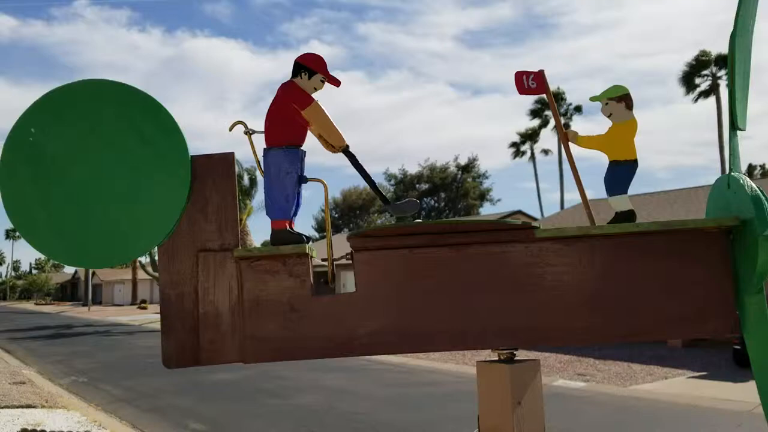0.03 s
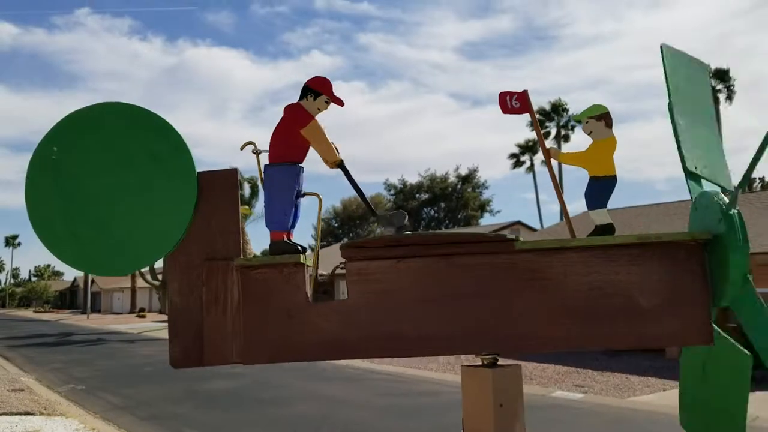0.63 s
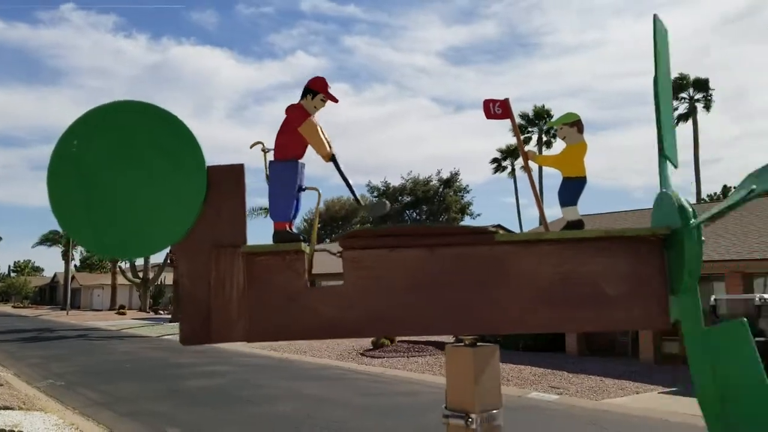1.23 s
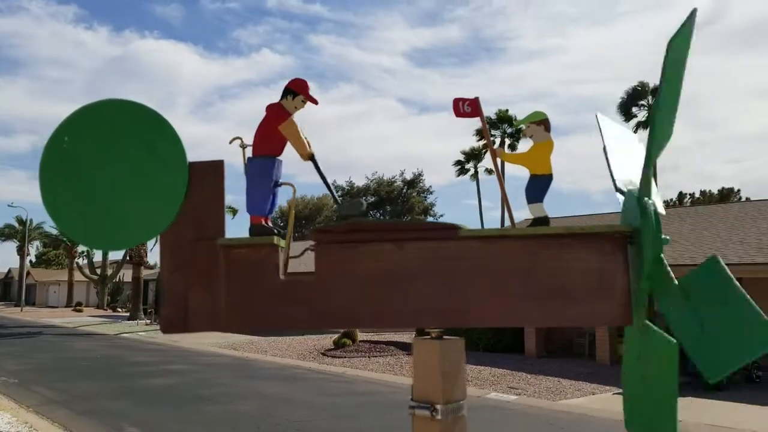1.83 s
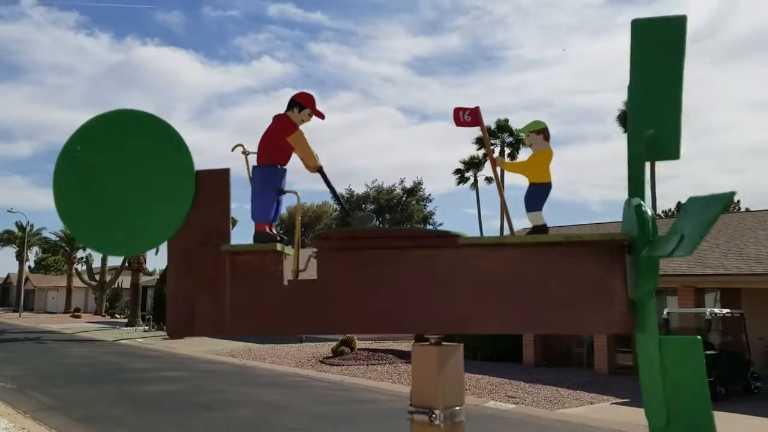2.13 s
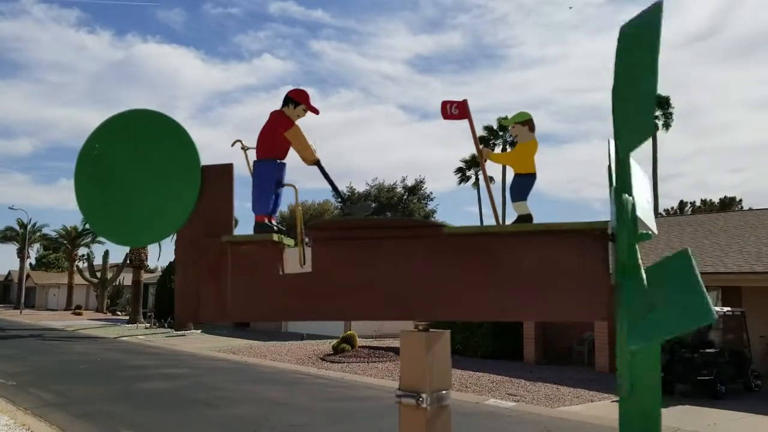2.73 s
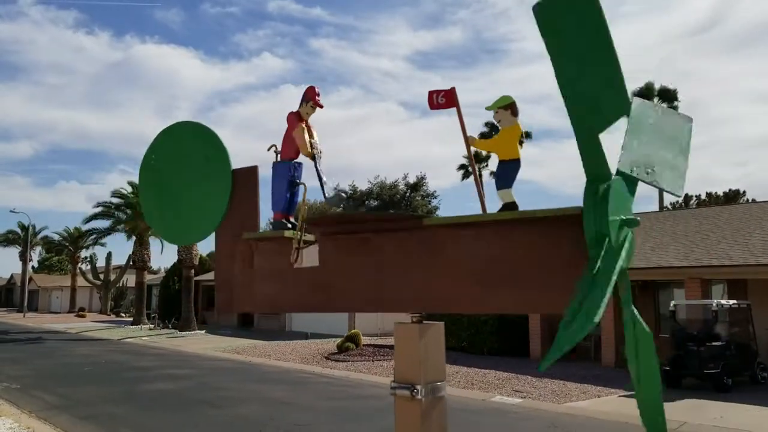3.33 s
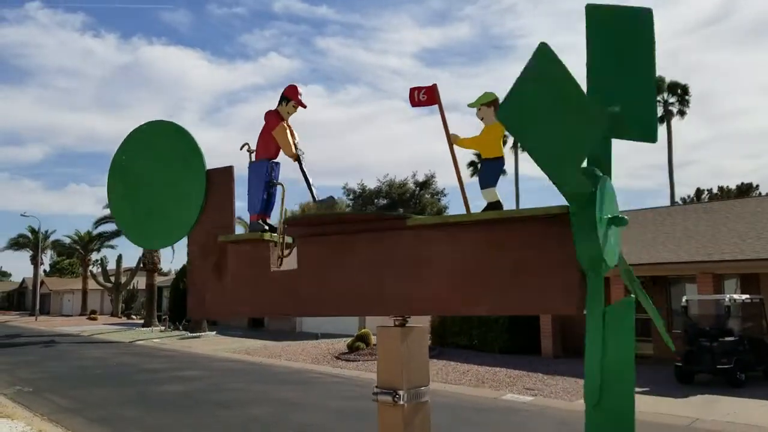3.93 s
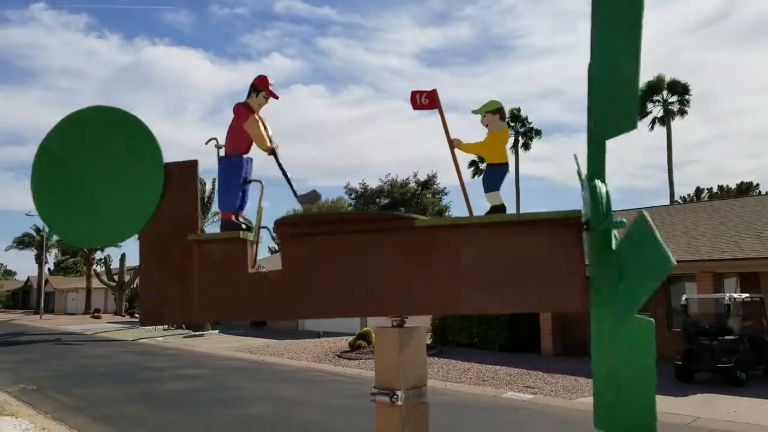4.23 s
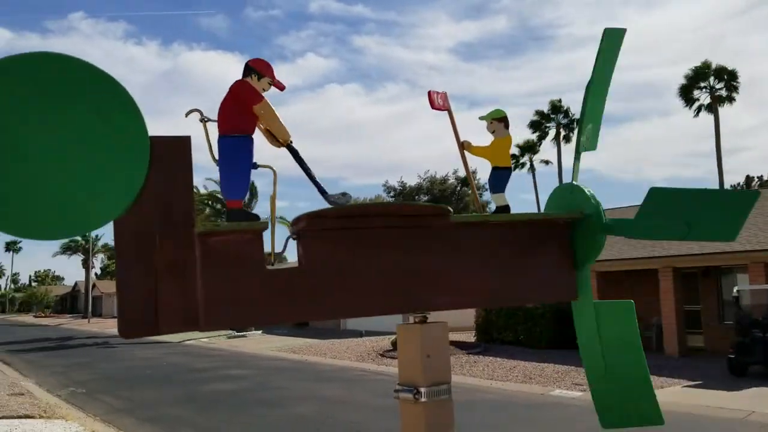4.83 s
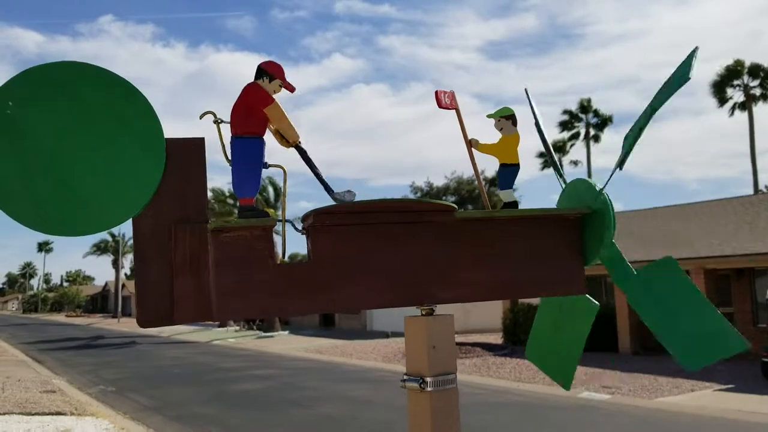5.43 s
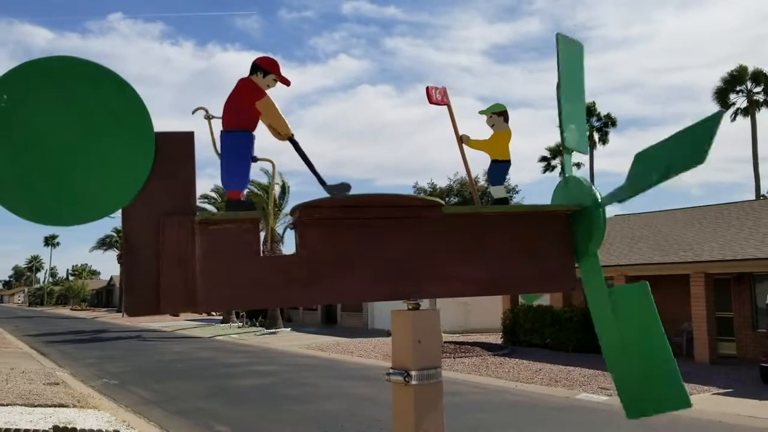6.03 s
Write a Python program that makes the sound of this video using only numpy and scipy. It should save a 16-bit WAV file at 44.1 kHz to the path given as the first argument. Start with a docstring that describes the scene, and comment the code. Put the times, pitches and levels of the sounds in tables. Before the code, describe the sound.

A wooden whirligig spins close to the microphone on a quiet street. Its loose wire linkage clicks rapidly and unevenly, mixed with wooden knocks, while gusts rumble and pop on the left. The crank soon adds short, high squeaks and scrapes, and the wind spreads to both sides. The clatter thins out past the middle, then returns with a few dull bumps. Faint bird chirps, rustling leaves and distant traffic lie behind.

```python
"""A wooden whirligig in a quiet street, close to a hand-held camera with two microphone ports.
At first, gusts buffet and click in the left port while the wire linkage chatters in its loose holes and
the carved figure knocks on the frame. From about 1.3 s the dry crank squeaks as well as scrapes, and
the wind spreads to both ports. Midway a small bird chirps far off; after 5 s the frame bumps its post.
Leaves rustle and distant roads rumble throughout."""
import sys
import numpy as np
from scipy import signal
from scipy.fft import rfft, irfft
from scipy.io import wavfile
from scipy.ndimage import uniform_filter1d

SR = 44100
rng = np.random.default_rng(int(sys.argv[2]) if len(sys.argv) > 2 else 0)


def master(y):
    """Save y as 16-bit WAV."""
    cut = np.clip(np.atleast_2d(y).T, -1, 1)
    pcm = np.round(cut * 32767)  # scale
    wavfile.write(sys.argv[1], SR, pcm.astype(np.int16))


N = 268128
T = np.arange(N) / SR

# clear hits of the wire linkage: (time [s], level [dB], brightness [dB], bounce decay [s])
WIRE_HITS = [(0.1059, -28.5, 3, 0.0092), (.196, -35, -12, 0.0051), (0.205, -27, -11, 0.0099),
             (.221, -35, -5, 0.004), (.251, -42, 6, 0.0036), (0.292, -30, -10, 0.002),
             (0.2949, -23, -9, 0.0025), (.302, -24, -26, 0.0036), (.308, -30, -27, 0.0036),
             (0.3255, -17.5, 6, 0.0052), (0.33, -20.5, -1, 0.0033), (.340, -38, 0, .003),
             (0.353, -27, -6, 0.011), (0.365, -24, -8, 0.0041), (0.377, -45, -10, .004),
             (0.415, -30, -7, 0.0086), (0.462, -26.5, -8, 0.003), (.474, -23.5, -6, 0.0063),
             (.487, -27.5, 2, 0.0039), (.504, -36, 8, 0.0027), (.523, -37, 11, 0.002),
             (0.5435, -19.5, -3, 0.002), (.551, -21, -1, 0.0035), (.5555, -31, -12, .002),
             (0.571, -21, -3, 0.007), (.583, -32, -2, .002), (0.5883, -25, -2, 0.003),
             (0.6153, -25.5, -3, 0.012), (0.628, -25, 1, .006), (0.642, -32, -6, .003),
             (.656, -38, -12, .003), (0.685, -36, -3, 0.0061), (0.6984, -22.5, 3, 0.0086),
             (0.71, -25, -9, 0.005), (0.724, -23.5, -9, 0.0045), (.743, -27.5, 4, .003),
             (.759, -28.5, 3, 0.0037), (.78, -37, 12, .003), (0.801, -28, -23, 0.0058),
             (0.811, -21.5, -23, 0.0041), (0.835, -22.5, 2, 0.01), (0.844, -20, -4, 0.0048),
             (.867, -30, -7, 0.0046), (0.88, -30, -4, .005), (0.893, -32, 4, .003), (.909, -37, 5, .004),
             (0.935, -37, 7, .004), (.98, -27.5, -8, 0.0067), (.994, -30.5, -6, 0.018),
             (1.036, -36, -1, .003), (1.075, -26, -4, 0.0023), (1.085, -29, -12, 0.0068),
             (1.105, -29, 0, 0.0056), (1.12, -29.5, 2, .004), (1.135, -31, -3, 0.0059),
             (1.173, -36, -4, 0.007), (1.196, -31.5, -3, 0.0046), (1.2494, -30, -13, 0.0042),
             (1.281, -30, -11, 0.0068), (1.362, -27, -6, 0.0064), (1.376, -40, -11, .003),
             (1.395, -29.5, -6, 0.0072), (1.409, -30, 1, 0.0033), (1.445, -35, -2, .003),
             (1.467, -33, 11, 0.0048), (1.548, -40, -5, 0.0034), (1.566, -31.5, -14, 0.0026),
             (1.593, -22.5, -11, 0.0054), (1.6824, -25, -10, 0.011), (1.696, -33, 6, 0.031),
             (1.783, -33, 5, 0.0043), (1.899, -39, -17, .004), (1.953, -29.5, 0, 0.011),
             (2.0343, -25, -10.5, 0.015), (2.059, -32, 8, 0.0076), (2.095, -36, 2, .003),
             (2.251, -33.5, -9, 0.0037), (2.298, -33.5, -1, 0.0082), (2.323, -32, 11, 0.0072),
             (2.386, -25.5, -4, 0.0096), (2.452, -31, -3, .003), (2.501, -27.5, 3, 0.01),
             (2.608, -35, -10, 0.0044), (2.681, -33.5, 2, 0.017), (2.7372, -27.5, -5, 0.004),
             (2.747, -27.5, -11, 0.01), (2.757, -34, 4, .004), (2.8375, -32.5, 4, 0.011),
             (2.849, -32, -4, .003), (2.964, -39, 0, .008), (2.98, -29.5, -1, 0.012),
             (3.024, -28, -6, 0.0084), (3.043, -34, 4, .004), (3.0684, -36, 7, .004),
             (3.122, -26, -7, 0.0082), (3.15, -25, 17, 0.0035), (3.1844, -38, 3, .009),
             (3.259, -37, -7, .004), (3.2928, -29, 2.5, 0.005), (3.482, -34.5, -5, 0.024),
             (4.232, -35, -7, 0.012), (4.381, -29.5, -43, 0.014), (4.533, -31.5, -7, 0.0076),
             (4.634, -33, -17, .003), (4.6665, -29.5, -11, 0.011), (4.741, -23.5, -3, 0.0074),
             (4.7577, -23, -21, 0.0079), (4.83, -22.5, -2.5, 0.018), (4.924, -31.5, -9, 0.018),
             (4.962, -29.5, -5, 0.0046), (5.001, -25, -7, 0.012), (5.048, -36, -14, 0.0043),
             (5.0828, -28.5, -17, 0.0083), (5.0963, -23.5, -12, 0.0028), (5.12, -25.5, 3, 0.0098),
             (5.1706, -31.5, -6, 0.0081), (5.1947, -30.5, -5, 0.0054), (5.379, -26, -7, 0.005),
             (5.4528, -29, -17, 0.0025), (5.4632, -21.5, -9, 0.0096), (5.498, -21.5, 1, 0.005),
             (5.51, -30, 0, .004), (5.5573, -33, -18, 0.0046), (5.567, -31, -13, .003),
             (5.6115, -28.5, -4, 0.016), (5.713, -28, -53, 0.0045), (5.774, -29, -2, 0.0073),
             (5.8564, -22, -20, 0.0071), (5.8848, -28.5, 1, 0.0065), (5.984, -31.5, -9, 0.026)]
# crack of a wire hit: (frequency [Hz], level [dB])
WIRE_SPECTRUM = [(300, -15), (1200, 1), (2400, 0.5), (3100, -3), (3900, 5.5), (5400, 1.5), (6900, 1.5),
                 (8500, -7.5), (9700, -4.5), (11400, 4.5), (14000, -1), (16000, -1)]
# modes of the linkage and its fittings: (frequency [Hz], level [dB], t60 before damping [s])
WIRE_MODES = [(2600, -3, 0.17), (3930, 6.5, 0.045), (4540, 6, 0.037), (4430, 6.5, 0.15), (4720, 5.5, 0.012),
              (5380, 3, 0.0097), (5530, 8.5, 0.054), (6230, 14, 0.074), (6710, 12.5, 0.041),
              (6900, 7, .0074), (10470, 9.5, 0.078), (11380, -3, 0.036), (12800, -2, .04), (12860, -5, .04),
              (13760, 8, 0.039)]
# the figure knocks on the frame: (time [s], level [dB])
FIGURE_KNOCKS = [(0.3245, -28.5), (0.5754, -28.5), (0.837, -25), (0.8482, -32), (.98, -46), (1.024, -36.5),
                 (1.1514, -32.5), (1.25, -40.5), (1.305, -40), (1.398, -34.5), (1.408, -35), (1.437, -38.5),
                 (1.6736, -38.5), (1.966, -37), (2.081, -37), (2.389, -37), (2.432, -32), (2.4607, -33),
                 (2.7776, -24.5), (3, -38.5), (3.0333, -31), (3.054, -36), (3.132, -33), (3.151, -21.5),
                 (4.3935, -37), (4.43, -38), (5.02, -36), (5.086, -41), (5.121, -34.5), (5.389, -35.5),
                 (5.467, -42), (5.4975, -29.5), (5.51, -38), (5.545, -47)]
# modes of the wooden frame: (frequency [Hz], level [dB], t60 [s])
FRAME_MODES = [(570, 1, .04), (1058, 1, 0.066), (1290, 6, 0.071), (1386, 9, 0.037), (1640, -16, 0.011),
               (1770, 11, 0.026), (1905, 12.5, 0.026), (1977, 2, 0.059), (2450, -6.5, 0.078),
               (2650, -2, 0.066)]
# crack of wood on wood: (frequency [Hz], level [dB])
CRACK_SPECTRUM = [(200, -59), (800, -20), (1300, 2.5), (1950, 9.5), (2350, -3.5), (2650, -8), (3100, -14.5),
                  (3900, -3.5), (6000, -12.5), (16000, -12)]
# squeaks of the dry crank: (start [s], length [s], pitch [Hz], level [dB], octave [dB],
# pitch jitter [share], place of the crest [0-1], pitch bend [share], rasp [dB])
CRANK_SQUEAKS = [(1.257, 0.073, 5320, -30, -14.5, .001, 0.43, 0.009, -23),
                 (1.266, .06, 5590, -50, -25, 0.0045, .45, -0.0082, -22),
                 (1.434, 0.15, 2010, -58.5, -32, 0.0044, 0.3, 0.0031, -31),
                 (1.524, 0.047, 3870, -53.5, -28, 0.02, 0.5, -.04, -13),
                 (2.098, 0.089, 5290, -33.5, 0, .001, 0.85, 0.022, -17.5),
                 (2.127, 0.047, 4230, -43.5, -37, .004, 0.46, 0.0059, -16),
                 (3.013, 0.04, 4220, -48, -30, .003, 0.2, -0.02, -21),
                 (3.092, 0.097, 5650, -41.5, -15, 0.0066, 0.55, 0.0069, -6.5),
                 (3.153, 0.055, 5820, -35, -21, 0.014, 0.6, 0.013, -22),
                 (3.177, 0.037, 5480, -37, -15, 0.017, 0.37, -0.041, -9),
                 (3.832, 0.067, 4210, -45, -26, .003, 0.37, -0.013, -21),
                 (3.865, 0.048, 5510, -43, -12, .012, 0.5, 0.04, -19),
                 (3.93, 0.073, 5284, -33.5, -10, 0.0066, 0.42, 0.0088, -22.5),
                 (4.211, 0.32, 1587, -54, -30, .005, 0.2, -0.0029, -27),
                 (4.717, 0.051, 4180, -40.5, -30, 0.0086, 0.53, 0.018, -27),
                 (4.735, 0.12, 5331, -30.5, -3.5, 0.0012, 0.6, .001, -22),
                 (4.748, .045, 11500, -31, -40, .009, 0.7, .055, -23),
                 (5.727, 0.034, 4170, -48.5, -30, .002, .45, -0.012, -24),
                 (5.791, 0.12, 5380, -55.5, -21, .006, 0.44, 0, 0)]
# friction noise under a squeak: (frequency [Hz], level [dB])
RASP_SPECTRUM = [(1500, 2), (3000, -14), (4200, 1), (6800, -6), (8500, -12), (11000, -5.5), (13000, -7),
                 (16000, -8)]
# the shaft rubs on the wood: (start [s], length [s], level [dB], share of creak [0-1])
SHAFT_RUBS = [(0.631, 0.046, -46, 0.6), (3.2, .26, -60.5, .05), (1.42, 0.34, -76, 0),
              (1.657, 0.13, -52.5, 0.04), (2.42, 0.067, -59, 0.06), (4.639, 0.087, -41.5, 0.87),
              (4.762, 0.12, -54, 0.1), (5.071, 0.057, -50, 0), (5.203, 0.18, -50, 0.05),
              (5.432, 0.12, -53, 0.06)]
# noise of a rub: (frequency [Hz], level [dB])
RUB_SPECTRUM = [(500, -18), (1400, 11), (2100, -2), (3000, -2), (4100, 7), (6500, -1.5), (8300, -11),
                (12000, -15), (16000, -26)]
# resonances of the creaking shaft: (frequency [Hz], width [Hz], level [dB])
CREAK_PEAKS = [(2090, 110, -1.5), (2580, 200, -9.5), (3100, 150, -4.5), (3550, 180, -2.5), (5570, 170, -14)]
# the frame bumps its post: (time [s], level [dB])
POST_BUMPS = [(5.026, -28), (5.122, -34), (5.4991, -21.5), (5.513, -34)]
# low modes of the post: (frequency [Hz], level [dB], t60 [s])
POST_MODES = [(144, 3, 0.044), (240, -3.5, 0.052), (327, -2.5, 0.044), (560, -5, .05)]
# gusts and lulls at the microphone: (time [s], rumble [dB], flutter [dB])
GUSTS = [(.11, -35, -43.5), (.3, -25, -28), (.45, -22, -37), (.58, -28.5, -25.5), (.635, -32.5, -54),
         (.78, -23.5, -38), (.84, -34, -59), (.95, -34.5, -67), (1.04, -28.5, -37), (1.12, -39.5, -53),
         (1.18, -33.5, -35.5), (1.25, -42, -52), (1.33, -46.5, -45), (1.55, -50, -47), (1.97, -40.5, -48.5),
         (2.05, -43, -44), (2.11, -37, -34), (2.23, -35.5, -39.5), (2.33, -34, -23), (2.49, -45, -35),
         (2.56, -39.5, -48), (2.65, -44.5, -44.5), (2.73, -35, -32.5), (2.82, -42, -48),
         (2.92, -37.5, -29.5), (3.12, -33.5, -36.5), (3.33, -50.5, -50.5), (3.43, -46.5, -46.5),
         (3.5, -34.5, -37.5), (3.66, -32.5, -27), (3.74, -34.5, -43), (3.92, -35, -27.5),
         (4.2, -31.5, -43.5), (4.28, -35.5, -40), (4.55, -41.5, -43), (4.79, -41, -47.5), (5.0, -44, -47.5),
         (5.27, -41.5, -47), (5.35, -49, -52), (5.47, -42, -45), (5.6, -50, -52), (5.78, -55, -57),
         (5.95, -42.5, -45), (6.08, -49.5, -48)]
# the first gust falls on the left port, later ones on both: (time [s], left over right [dB])
WIND_PAN = [(.11, 37), (.43, 14), (.58, 26), (.87, 3), (1.05, 15), (1.3, 9.5), (1.95, 3), (2.2, -2),
            (3.4, 0), (4.4, -4), (4.9, 2.5), (6.08, 2)]
# deep rumble of the wind: (frequency [Hz], level [dB])
RUMBLE_SPECTRUM = [(15, -29), (35, -8.5), (80, 0), (140, -1), (220, -5), (400, -13), (1000, -39),
                   (3000, -87)]
# flutter above the rumble: (frequency [Hz], level [dB])
FLUTTER_SPECTRUM = [(40, -38), (150, -38), (280, -1), (450, -3), (620, -15), (850, -20.5), (1300, -40),
                    (2200, -58), (5000, -61), (16000, -78)]
# the strongest eddies that hit the ports: (time [s], level [dB], pitch [Hz], length [s])
PORT_EDDIES = [(0.107, -9.5, 433, 0.011), (0.164, -18, 333, 0.0069), (0.171, -10.5, 483, 0.0043),
               (0.257, -8.5, 440, 0.017), (.281, -5.5, 447, 0.012), (0.363, -16.5, 327, 0.0094),
               (0.379, -18.5, 326, 0.012), (0.421, -8.5, 318, 0.0087), (.445, -11, 365, 0.012),
               (0.462, -12.5, 340, 0.0088), (0.49, -20.5, 290, 0.017), (0.554, -11.5, 370, 0.01),
               (0.567, -8.5, 326, 0.016), (0.587, -11, 320, 0.021), (0.66, -15, 283, 0.013),
               (0.733, -9, 272, 0.01), (0.785, -16.5, 300, 0.021), (0.861, -13, 255, 0.007),
               (0.893, -20, 300, 0.015), (0.981, -19.5, 300, 0.012), (1.013, -15.5, 330, 0.0037),
               (1.039, -19, 352, 0.0098), (1.064, -17, 334, 0.006), (1.179, -21, 397, 0.0075),
               (1.198, -26, 344, 0.017), (1.663, -19.5, 312, 0.01), (1.825, -29, 365, 0.0089),
               (1.965, -24, 375, 0.01), (1.992, -16, 385, 0.018), (2.095, -21, 318, 0.013),
               (2.185, -16.5, 420, 0.016), (2.266, -30, 415, 0.0088), (2.303, -18.5, 392, 0.02),
               (2.336, -16.5, 403, 0.0091), (2.371, -17.5, 380, 0.013), (2.389, -25, 427, 0.012),
               (2.452, -20.5, 407, 0.014), (2.475, -16, 413, 0.015), (2.507, -25, 400, 0.0065),
               (2.677, -27, 363, 0.017), (2.73, -23, 412, 0.022), (2.869, -22, 376, 0.006),
               (2.894, -20.5, 364, 0.024), (2.954, -20, 350, 0.016), (3.072, -20.5, 374, 0.017),
               (3.092, -21, 380, 0.015), (3.373, -29, 260, 0.007), (3.47, -18.5, 318, 0.013),
               (3.525, -27, 350, .009), (3.549, -27, 353, 0.01), (3.634, -16, 440, 0.0076),
               (3.657, -16, 332, 0.018), (3.688, -17.5, 360, 0.016), (3.769, -31, 352, 0.015),
               (3.807, -42, 358, 0.016), (3.889, -16, 398, 0.02), (4.045, -18, 424, 0.039),
               (4.121, -14, 322, 0.007), (4.152, -20, 290, 0.012), (4.184, -17, 368, 0.02),
               (4.216, -15.5, 304, 0.0088), (4.36, -25.5, 316, 0.011), (4.412, -17.5, 343, 0.012),
               (4.519, -25.5, 320, 0.016), (4.641, -24.5, 240, 0.0089), (4.675, -27, 240, 0.0078),
               (4.767, -26, 240, 0.0059), (5.652, -38, 240, 0.016), (5.98, -29.5, 224, 0.0058)]
# dry clicks of wind, mostly in one port: (time [s], level [dB], pitch [Hz], left over right [dB])
PORT_CLICKS = [(0.1764, -6.5, 280, 30), (0.2627, -11, 270, 29), (0.2683, -7, 240, 29),
               (0.2951, -4, 210, 28), (0.3232, -12, 300, 27), (0.4201, -14, 209, 17), (0.452, -5, 210, 27),
               (0.5278, -24, 270, 22), (0.5583, -11.5, 240, 27), (0.5687, -11, 210, 28),
               (0.633, -11.5, 1170, 24), (0.6561, -16.5, 386, 25), (0.7362, -17, 240, 23),
               (0.7595, -20, 380, 10), (1.0405, -29, 300, 21), (1.0595, -6.5, 268, 30),
               (1.1933, -16.5, 270, 25), (1.3899, -23.5, 340, 21), (2.2127, -23, 270, -15),
               (2.3078, -18, 210, -1), (2.376, -27, 240, 6), (2.4818, -17.5, 266, 17),
               (2.8993, -15.5, 206, 5), (2.9126, -17, 208, -3), (3.2363, -19.5, 340, 28),
               (3.4553, -22, 300, 25), (3.5433, -20.5, 270, 22), (3.558, -21, 480, 13),
               (3.6383, -14.5, 271, -4), (3.6537, -16.5, 240, -15), (3.6646, -18, 270, -11),
               (3.7035, -23, 270, -12), (3.7121, -20, 240, 15), (3.8514, -20.0, 420, -23),
               (3.8669, -19, 380, -24), (3.9501, -18.5, 540, -22), (3.9667, -28, 240, -14),
               (3.9969, -20, 430, -27), (4.0128, -22.5, 380, -16), (4.0357, -23, 270, 16),
               (4.0506, -14.5, 300, -21), (4.0645, -17, 382, -24), (4.1002, -21, 240, 20),
               (4.1246, -19, 240, 14), (4.2068, -20, 270, 11), (4.2329, -19.0, 430, -17),
               (4.2451, -23, 483, -19), (4.3218, -18, 380, -21), (4.419, -23, 480, -25),
               (4.4317, -20, 480, -24), (4.4449, -23.5, 340, -26), (5.0215, -22, 1200, 3)]
# a far bird: (start [s], length [s], first pitch [Hz], last pitch [Hz], level [dB])
BIRD_CHIRPS = [(2.804, 0.022, 4530, 4150, -48), (2.827, 0.022, 4600, 4200, -47),
               (2.856, 0.014, 3100, 3550, -47), (2.868, 0.032, 4000, 4240, -45.5),
               (3.735, 0.078, 5130, 4800, -53.5), (4.477, 0.06, 4830, 5440, -49),
               (4.514, 0.031, 4900, 4300, -54), (4.583, 0.041, 3900, 4470, -49.5)]
# the breeze in the leaves: (time [s], level [dB])
RUSTLE_LEVELS = [(.11, -59), (.7, -51), (1.2, -57), (1.9, -56.5), (2.5, -54), (3.35, -58), (3.7, -56),
                 (4.35, -54), (4.9, -56), (5.3, -54.5), (5.65, -54), (6.08, -56.5)]
# rustle of the leaves: (frequency [Hz], level [dB])
LEAF_SPECTRUM = [(350, -30), (600, 14.5), (801, 9.5), (869, 7), (931, 6), (1430, 4), (1660, 2.5),
                 (1830, 7.5), (2340, -2), (3990, -2.5), (6830, -10), (8620, -19), (11700, -77),
                 (16000, -47)]
# distant roads: (frequency [Hz], level [dB])
TRAFFIC_SPECTRUM = [(30, 6.5), (130, 8.5), (300, -9), (600, -36), (1000, -17), (2000, -33), (5000, -29)]
# how the ports hear the whirligig and bird: (frequency [Hz], left lead [rad], left over right [dB])
PORT_RESPONSE = [(250, 0, -1), (576, -2.5, 5), (1760, 1.18, 0.5), (3470, -3.5, 4), (3680, 0, 2),
                 (4600, -1, -1), (5500, -1.62, 6.5), (6870, -2, -0.5), (8400, 1.5, 2), (10100, 1.86, -4),
                 (11100, 1.5, 2), (13000, 2, -8.5), (16000, 2, 7)]


def wire_contact(length, bright_db, ring_db=-4, spot_db=9.5, bounce_db=6, damping=1.8, shift=.068):
    """A sharp touch and its tiny bounces crack and ring the wire's modes; pressure shifts and damps them."""
    t = np.arange(5000) / SR
    hz, mode_db, t60 = np.transpose(WIRE_MODES)[:, :, None]
    spot, detune, port = rng.standard_normal((3, len(WIRE_MODES), 1))
    touch = 1.1 * np.exp(-t / .0005)
    bounces = np.exp(-t / max(length, .001)) * unit(amp(bounce_db * np.clip(wander(len(t), hz=533), -2, 2)))
    settling = amp(-28) * np.exp(-t / .025)
    force = noise_pair(len(t), shared=.29) * (touch + bounces + settling)
    weight_db = mode_db + spot_db * spot + bright_db * (hz > 9000)  # each spot favours other modes
    decay = amp(weight_db - 60 * damping * t / t60)
    modes = decay * np.exp(2j * np.pi * hz * (1 + shift * detune) * t) * np.sign(detune)
    ring = ring_modes(force[0], modes, right_phase=.8 * port)
    crack = causal_colour(force, WIRE_SPECTRUM, treble_db=bright_db)
    return unit_burst(unit(crack) + amp(ring_db) * unit(ring))


def linkage(level_db=-11.5):
    """Close up, the loose wire hits the edges of its holes as the crank goes round."""
    out = np.zeros((2, N))
    for at, db, bright_db, length in WIRE_HITS:
        add(out, at, amp(db + level_db) * wire_contact(length, bright_db))
    return out


def chatter(level_db=-55, per_s=45, spread_db=4, slack_s=.04, variants=24):
    """Between the clear hits the slack parts go on ticking lightly, loudest where the hits crowd."""
    at, db = np.transpose(WIRE_HITS)[:2]
    nearby_hits = (amp(db)[:, None] * np.exp(-abs(T[::256] - at[:, None]) / slack_s)).sum(0)
    slack = np.interp(T, T[::256], unit(nearby_hits) ** .55)
    out = np.zeros((2, N))
    for _ in range(variants):
        onsets = rng.random(N) < per_s / variants / SR
        hits = onsets * amp(spread_db * np.minimum(rng.exponential(1, N), 2)) * slack
        out += signal.oaconvolve(hits[None], wire_contact(length=.0056, bright_db=-4), axes=1)[:, :N]
    return amp(level_db) * out


def figure(level_db=-4, crack_t60=.11, shift=.0067, spot_db=.5, bounce_s=.0037):
    """Wood on wood: a blow and its tiny bounces ring the frame's crowded modes, under a rough crack."""
    out, t = np.zeros((2, N)), np.arange(6000) / SR
    hz, mode_db, t60 = np.transpose(FRAME_MODES)[:, :, None]
    for at, db in FIGURE_KNOCKS:
        spot, detune, port = rng.standard_normal((3, len(FRAME_MODES), 1))
        decay = amp(mode_db + spot_db * spot - 60 * t / t60)
        modes = decay * np.exp(2j * np.pi * hz * (1 + shift * detune) * t) * np.sign(detune)
        force = (t == 0) + .11 * rng.standard_normal(len(t)) * np.exp(-t / bounce_s)
        ring = ring_modes(force, modes, right_phase=.7 * port)
        crack = causal_colour(noise_pair(len(t), shared=.55) * amp(-60 * t / crack_t60), CRACK_SPECTRUM)
        add(out, at, amp(db + level_db) * unit_burst(unit(ring) + .55 * unit(crack)))
    return out


def crank(neighbour_db=-12, beat_hz=263, third_db=-24, flutter_db=1.9, grain_db=3, fray_hz=420):
    """Stick and slip locks on to a mode of the shaft and swells over a grainy rasp."""
    out = np.zeros((2, N))
    for at, length, hz, db, octave_db, jitter, crest, bend, rasp_db in CRANK_SQUEAKS:
        size = int(length * SR)
        along = np.linspace(0, 1, size)
        swell = np.sin(np.interp(along, [0, crest, 1], [0, 1, 0]) * np.pi / 2)
        pitch = hz * (1 + bend * (along - .5) + jitter * wander(size, hz=503))
        phase = 2 * np.pi * np.cumsum(pitch) / SR
        # a weaker mode just above beats with the squeak
        beat = 2 * np.pi * beat_hz * np.arange(size) / SR + .39 * wander(size, hz=80)
        tone = 0
        for k, partial_db in enumerate([0, octave_db, third_db], 1):
            # uneven slips fray each partial on its own
            slips = (wander(size, fray_hz) + 1j * wander(size, fray_hz)) / np.sqrt(2)
            fray = k * amp(rasp_db + 3) * slips
            partial = np.exp(1j * k * phase) * (1 + amp(neighbour_db) / k * np.exp(1j * beat) + fray)
            tone += amp(partial_db) * partial.imag * (k * hz < SR / 2)
        friction = colour(noise_pair(size, shared=.99), RASP_SPECTRUM)
        rasp = amp(rasp_db) * unit(friction * amp(grain_db * wander(size, hz=300)))
        gain = amp(db + flutter_db * wander(size, hz=200))
        add(out, at, gain * (tone * swell ** 1.83 + rasp * swell ** .5))
    return out


def shaft_scrape():
    """The shaft rubs on the wood; under load it half locks into a few creaking resonances."""
    out = np.zeros((2, N))
    for at, length, db, creak_share in SHAFT_RUBS:
        size = int(length * SR)
        friction = noise_pair(size, shared=.51)
        f = np.fft.rfftfreq(size, 1 / SR)
        peaks = sum(amp(peak_db) / (1 + (2 * (f - hz) / width) ** 2) for hz, width, peak_db in CREAK_PEAKS)
        rub = np.sqrt(1 - creak_share) * unit(colour(friction, RUB_SPECTRUM))
        creak = np.sqrt(creak_share) * unit(irfft(rfft(friction) * peaks, size))
        envelope = signal.windows.tukey(size, .3) * np.linspace(1.2, .7, size)
        add(out, at, amp(db) * (rub + creak) * envelope)
    return out


def post(rise_s=.00087):
    """The frame rocks on its pivot and drops against the post with a dull bump."""
    out, t = np.zeros((2, N)), np.arange(8000) / SR
    hz, mode_db, t60 = np.transpose(POST_MODES)[:, :, None]
    modes = amp(mode_db - 60 * t / t60) * np.sin(2 * np.pi * hz * t)
    thud = modes.sum(0) * (1 - np.exp(-t / rise_s))
    for at, db in POST_BUMPS:
        add(out, at, amp(db) * thud / abs(thud).max())
    return out


def wind(rumble_db=2, flutter_db=-1, wake_db=-12, wake_s=.015, wake_hz=340):
    """Turbulence right on the microphone: a deep rumble, and a lumpy flutter above it."""
    times, *levels = np.transpose(GUSTS)
    low_db, high_db = (np.interp(T, times, db) for db in levels)
    # each eddy stirs the rumble for a moment, the more so the lower its pitch
    wake = sum(amp(db + wake_db) * (wake_hz / hz) ** 2 * np.exp(-((T - at - length) / wake_s) ** 2)
               for at, db, hz, length in PORT_EDDIES)
    lumps = wander(N, hz=42.4)
    rumble = colour(noise_pair(N, shared=.097), RUMBLE_SPECTRUM) * amp(2.5 * lumps)
    flutter = colour(noise_pair(N, shared=.22), FLUTTER_SPECTRUM) * amp(5.5 * lumps)
    rumble = steadied(rumble, seconds=.079) * np.hypot(amp(low_db + rumble_db), wake)
    flutter = steadied(flutter, seconds=.163) * amp(high_db + flutter_db)
    return (rumble + flutter) * wind_pan(T)


def eddies(level_db=-10, skew_db=-3.5):
    """Each eddy passes nearer one port or the other: a low pop that swells and drops away quickly."""
    out, t = np.zeros((2, N)), np.arange(4096) / SR
    for at, db, hz, length in PORT_EDDIES:
        age = t / (length / 2.02)
        spectrum = [(hz / 8, -15), (hz / 2, -5), (hz, 0), (hz * 1.39, -2.5),
                    (hz * 2.16, -17), (hz * 8, -45), (hz * 30, -75)]
        pop = causal_colour(noise_pair(len(t), shared=.29) * age * np.exp(-age ** 2 / 2), spectrum)
        pop /= np.sqrt((pop ** 2).sum(1, keepdims=True) / (SR * length))
        sides = wind_pan(at) * pan(skew_db * rng.standard_normal())
        add(out, at - .001, amp(db + level_db) * pop * sides)
    return out


def wind_clicks(crackle_db=-3, per_s=50, crackle_hz=400, spread_db=3):
    """Gusts click in the ports: loud single swings, and a crackle that grows with the flutter."""
    out = np.zeros((2, N))
    for at, db, hz, pan_db in PORT_CLICKS:
        add(out, at - .01, amp(db) * pressure_swing(hz) * pan(pan_db))
    times, _, flutter_db = np.transpose(GUSTS)
    onsets = rng.random((2, N)) < per_s / SR
    hits = onsets * np.tanh(rng.standard_normal((2, N))) * amp(spread_db * rng.random((2, N)))
    hits *= amp(np.interp(T, times, flutter_db) + crackle_db)
    crackle = signal.oaconvolve(hits, pressure_swing(crackle_hz)[None], "same", axes=1)
    return out + crackle * wind_pan(T)


def pressure_swing(hz):
    """One sharp swing of pressure, a cusp without any ring, centred in 20 ms."""
    u = (2 * np.pi * hz * np.arange(-441, 442) / SR) ** 2
    return (1 - u) / (1 + u) ** 2 * np.hanning(len(u))


def wind_pan(times):
    """Left and right gains of the wind at the given times."""
    return pan(np.interp(times, *np.transpose(WIND_PAN)))


def bird(waver=.044):
    """Faint gliding chirps from far off."""
    out = np.zeros((2, N))
    for at, length, first_hz, last_hz, db in BIRD_CHIRPS:
        size = int(length * SR)
        hz = np.linspace(first_hz, last_hz, size) * (1 + waver * wander(size, hz=300))
        add(out, at, amp(db) * np.sin(2 * np.pi * np.cumsum(hz) / SR) * np.hanning(size))
    return out


def leaves(level_db=4, flicker_db=2):
    """A soft, wide rustle that rises and falls with the breeze."""
    breeze_db = np.interp(T, *np.transpose(RUSTLE_LEVELS))
    rustle = unit(colour(noise_pair(N, shared=.012), LEAF_SPECTRUM))
    return rustle * amp(breeze_db + level_db + flicker_db * wander(N, hz=56)) * pan(.98)


def traffic(level_db=-53):
    """The low, steady rumble of far roads."""
    return amp(level_db) * unit(colour(noise_pair(N, shared=.12), TRAFFIC_SPECTRUM))


def street_echoes(x, wet_db=-21, t60=.13, per_s=2000):
    """Thin, quick echoes from the road and the post."""
    t = np.arange(SR // 2) / SR
    taps = rng.standard_normal((2, len(t))) * (rng.random((2, len(t))) < per_s / SR)
    taps *= (t > .007) * amp(-60 * t / t60)
    return x + amp(wet_db) * signal.fftconvolve(x, taps / np.linalg.norm(taps[0]), axes=1)[:, :N]


def camera_body(x):
    """The camera body delays and shades each port differently across the spectrum."""
    hz, *columns = np.transpose(PORT_RESPONSE)
    lead, pan_db = (np.interp(np.fft.rfftfreq(N, 1 / SR), hz, c) for c in columns)
    return irfft(rfft(x) * pan(pan_db) * np.exp(.5j * np.array([lead, -lead])), N)


def ring_modes(force, modes, right_phase):
    """A force rings complex modes; each reaches the right port with its own phase shift."""
    body = np.array([modes.sum(0).imag, (modes * np.exp(1j * right_phase)).sum(0).imag])
    return signal.fftconvolve(force[None], body, axes=1)[:, :len(force)]


def amp(db):
    """Decibels to gain."""
    return 10 ** (np.asarray(db) / 20)


def unit(x):
    """Scales to an rms of one."""
    return x / np.sqrt(np.mean(x ** 2) + 1e-20)


def unit_burst(x):
    """Scales the loudest 6 ms to an rms of one."""
    return x / np.sqrt(uniform_filter1d((x ** 2).mean(0), size=260).max())


def steadied(x, seconds):
    """Takes the slow swells out of a noise."""
    return x / np.sqrt(uniform_filter1d(x ** 2, int(seconds * SR), axis=-1) + 1e-20)


def spectrum_db(points, hz):
    """Levels of a spectrum, joined on a log-frequency axis."""
    f, db = np.transpose(points)
    return np.interp(np.log(hz + 1), np.log(f), db)


def colour(x, points):
    """Filters by a spectrum."""
    size = x.shape[-1]
    return irfft(rfft(x) * amp(spectrum_db(points, np.fft.rfftfreq(size, 1 / SR))), size)


def causal_colour(x, points, treble_db=0):
    """Filters by a spectrum with minimum phase, so that attacks stay sharp."""
    hz = abs(np.fft.fftfreq(2048, 1 / SR))
    shelf_db = treble_db * np.clip((hz - 7000) / 3500, 0, 1)
    log_gain = np.log(amp(spectrum_db(points, hz) + shelf_db))
    response = np.fft.ifft(np.exp(np.conj(signal.hilbert(log_gain)))).real
    return signal.fftconvolve(x, response[None, :len(hz) // 2], axes=1)[:, :x.shape[1]]


def wander(size, hz):
    """Smooth random motion with an rms of one, up to about hz."""
    lowpass = np.exp(-(np.fft.rfftfreq(size, 1 / SR) / hz) ** 2)
    return unit(irfft(rfft(rng.standard_normal(size)) * lowpass, size))


def noise_pair(size, shared):
    """White noise at two ports that share a part of its power."""
    common, *own = rng.standard_normal((3, size))
    return np.sqrt(shared) * common + np.sqrt(1 - shared) * np.array(own)


def pan(left_db):
    """Left and right gains of constant power."""
    ratio = amp(np.atleast_1d(left_db))
    return np.array([ratio, np.ones_like(ratio)]) * np.sqrt(2 / (1 + ratio ** 2))


def add(mix, at, sound):
    """Mixes a sound in at a time in seconds."""
    part = mix[:, max(round(at * SR), 0):][:, :sound.shape[-1]]
    part += sound[..., :part.shape[1]]


def scene():
    """The whirligig close by, the bird and the street beyond, and wind on the microphone."""
    whirligig = linkage() + chatter() + figure() + post() + crank() + shaft_scrape()
    street = camera_body(street_echoes(whirligig + bird())) + leaves() + traffic()
    return street + wind() + eddies() + wind_clicks()


def record(dry):
    """The microphone opens a moment late and passes nothing much above 16 kHz."""
    open_s, edge_hz = .105, 15950
    opened = np.clip((T - open_s) / .002, 0, 1)
    lowpass = signal.firwin(401, edge_hz, window=("kaiser", 9), fs=SR)
    return signal.oaconvolve(dry * opened, lowpass[None], "same")


dry = scene()
out = record(dry)
master(out)
```